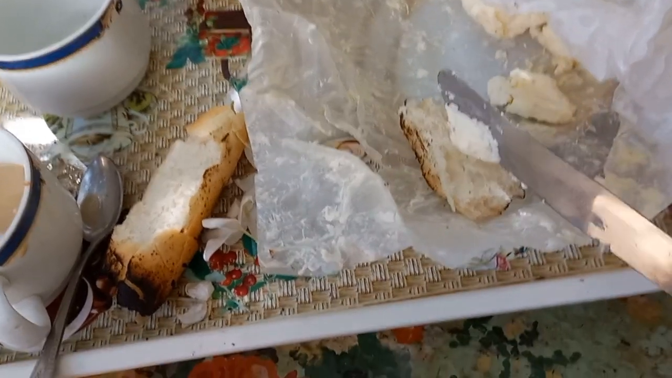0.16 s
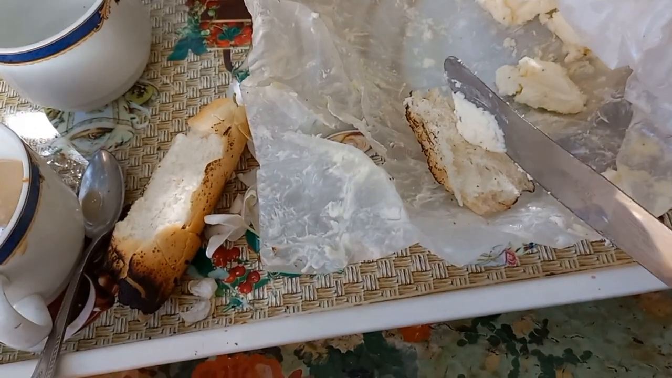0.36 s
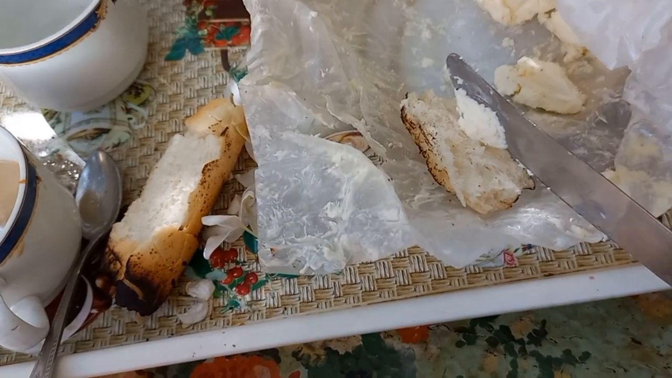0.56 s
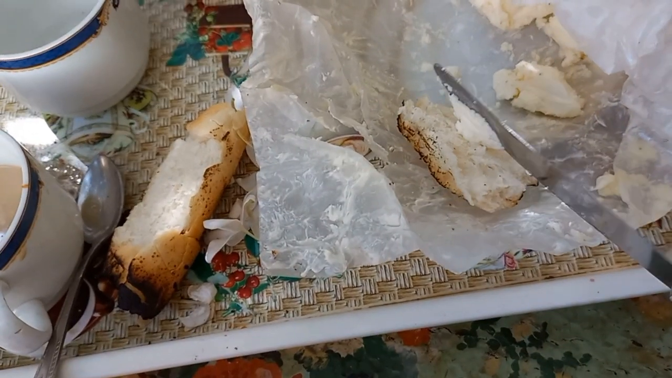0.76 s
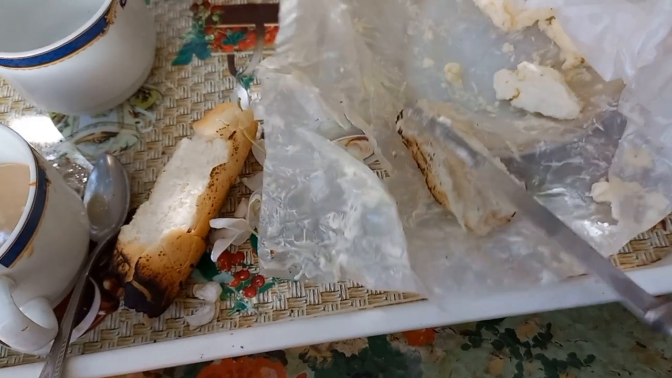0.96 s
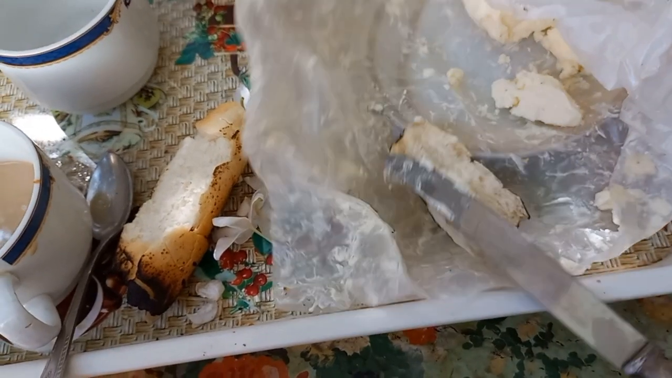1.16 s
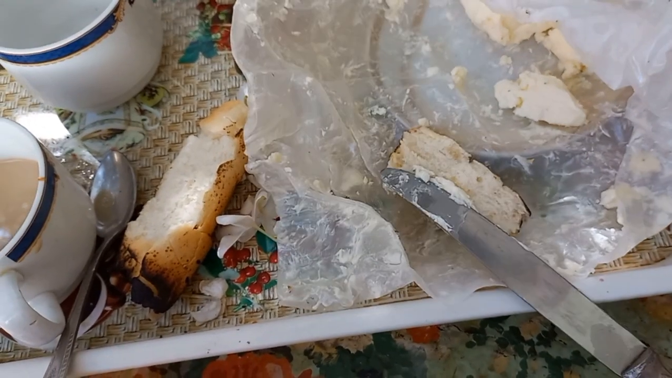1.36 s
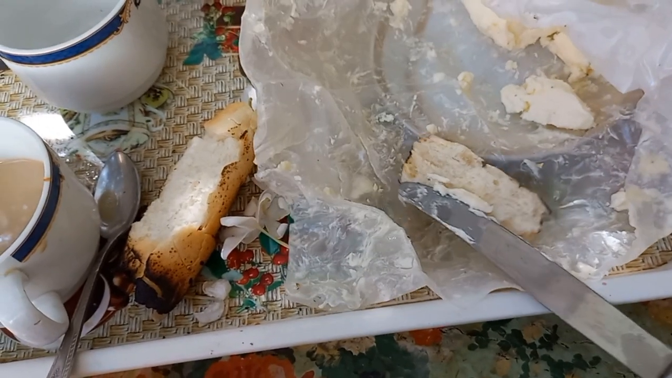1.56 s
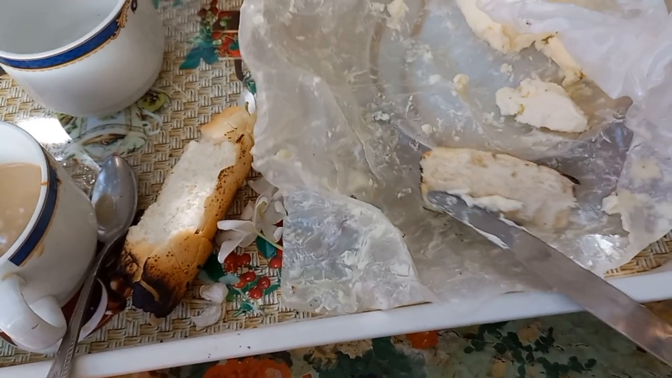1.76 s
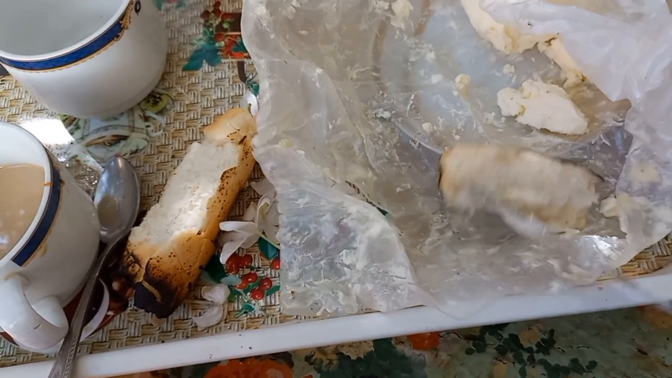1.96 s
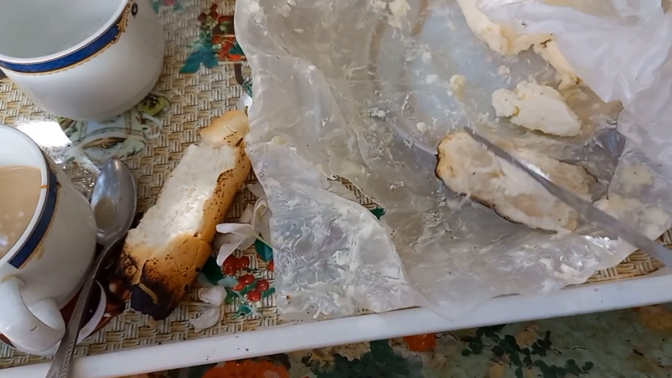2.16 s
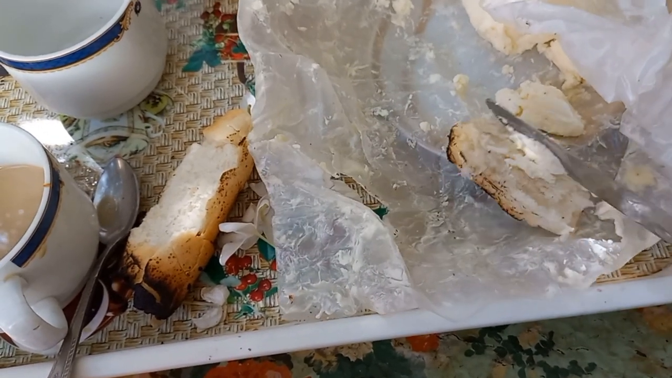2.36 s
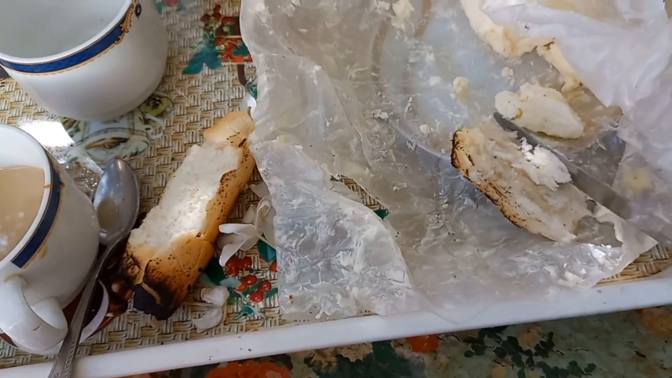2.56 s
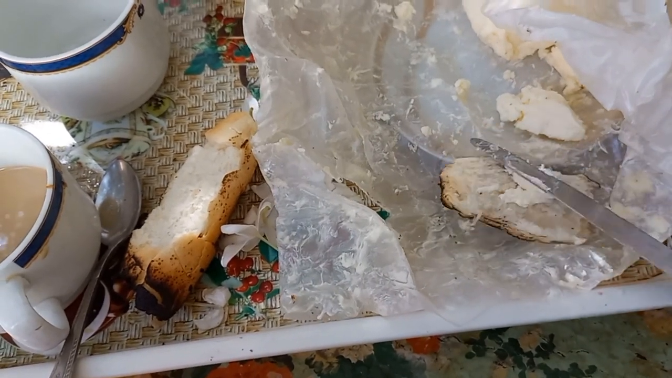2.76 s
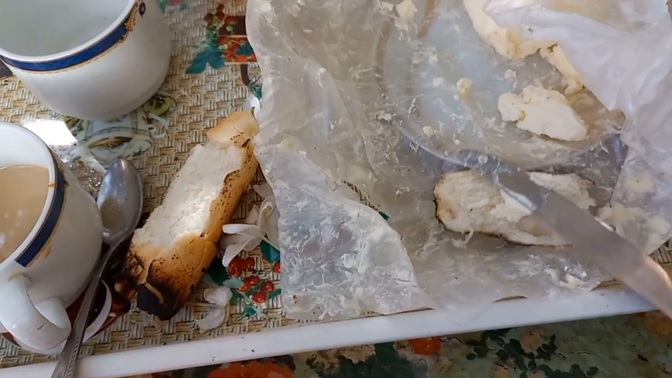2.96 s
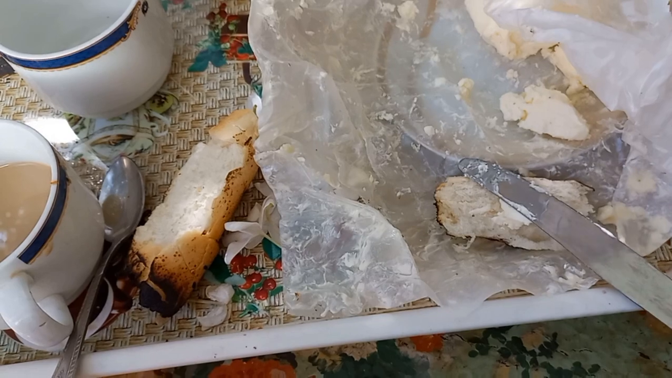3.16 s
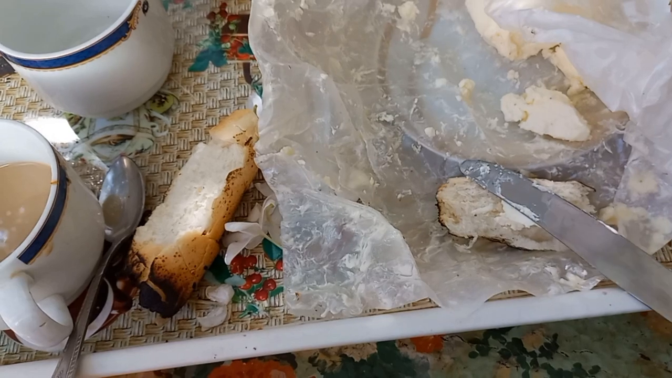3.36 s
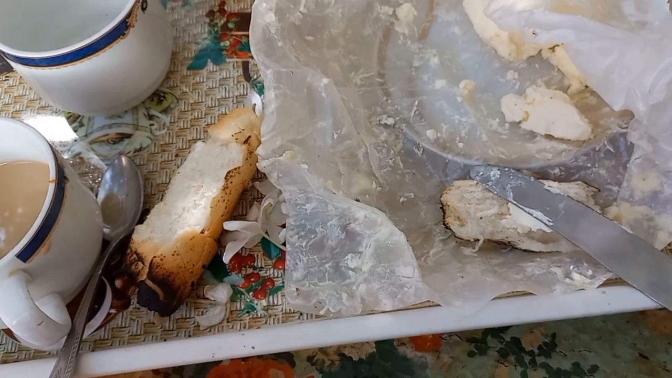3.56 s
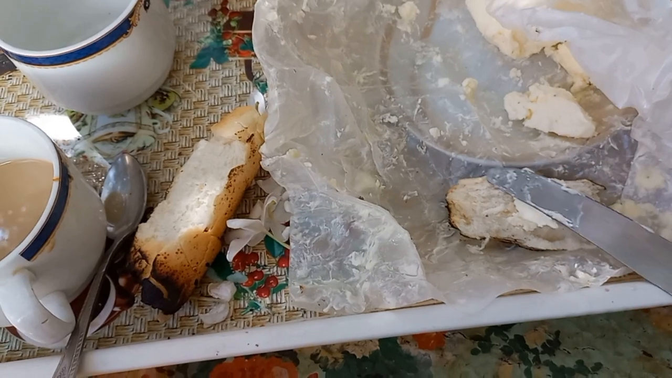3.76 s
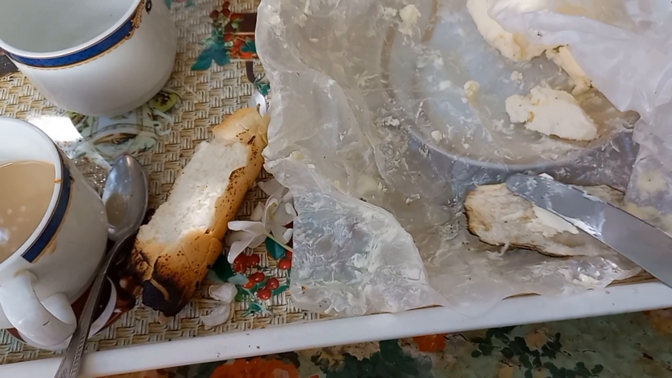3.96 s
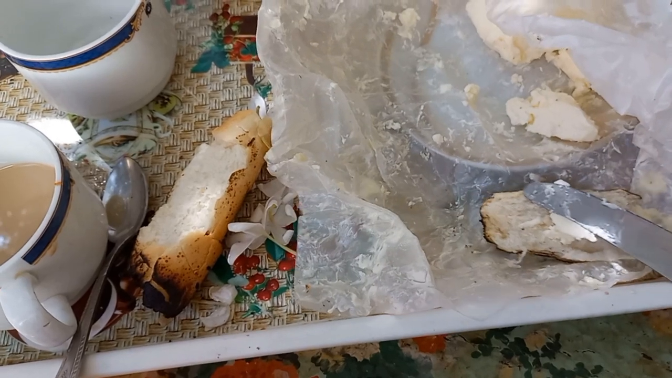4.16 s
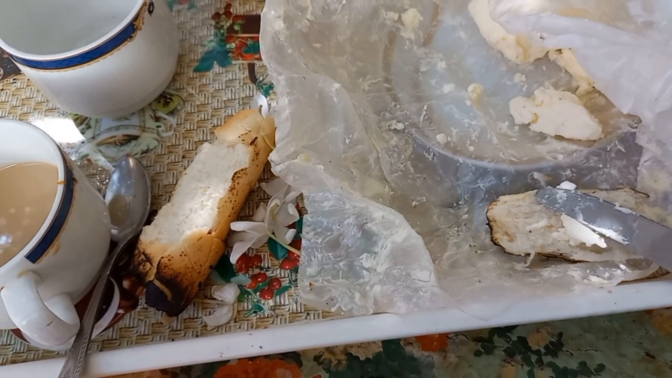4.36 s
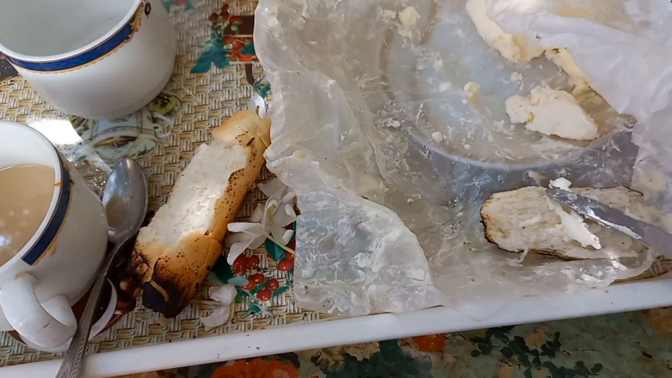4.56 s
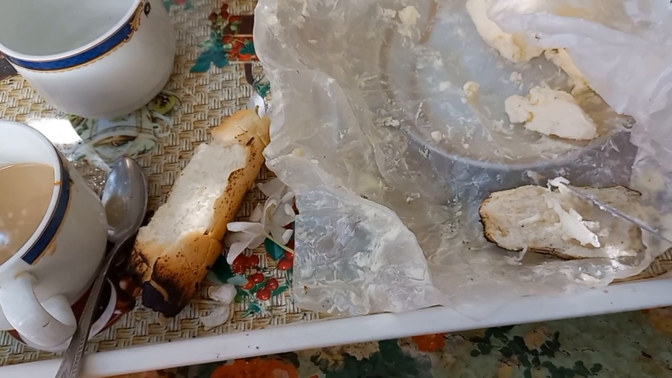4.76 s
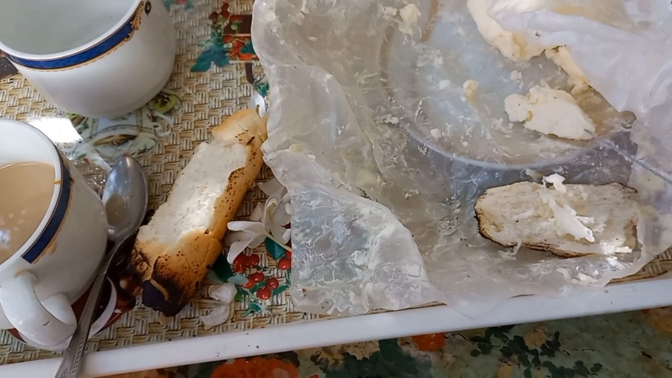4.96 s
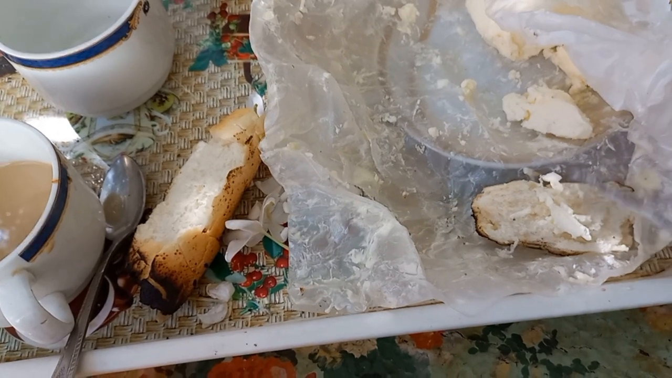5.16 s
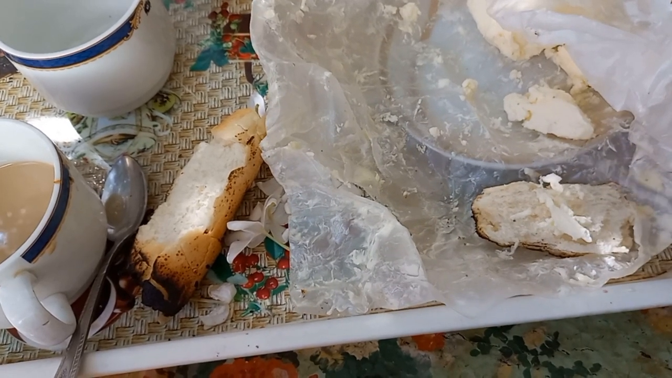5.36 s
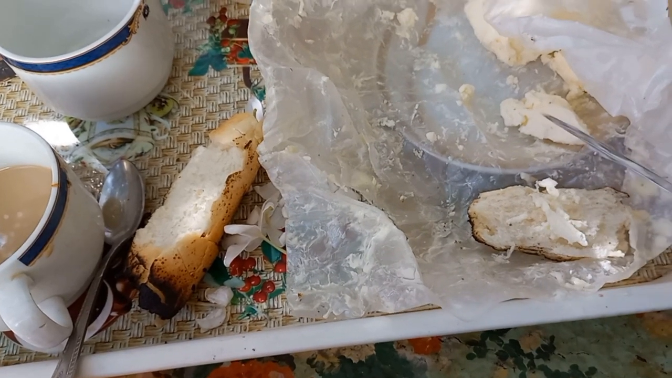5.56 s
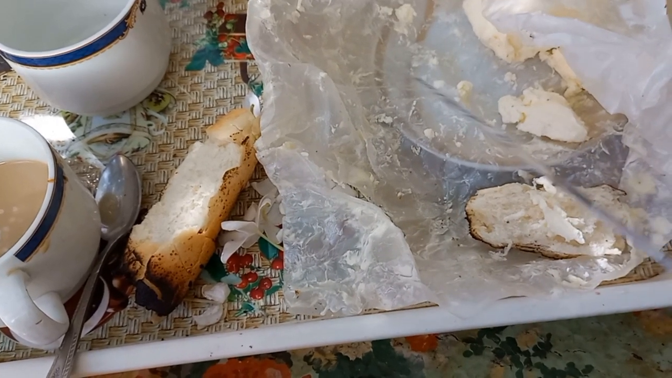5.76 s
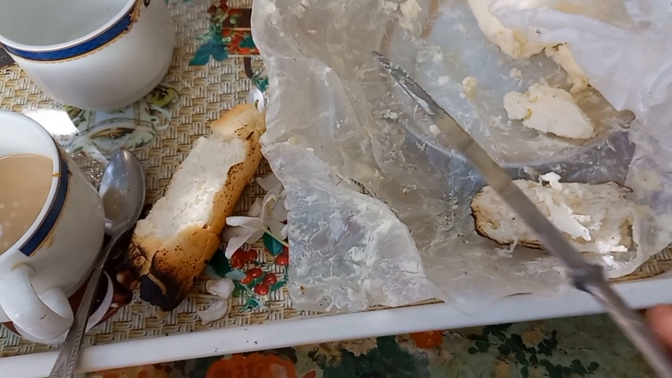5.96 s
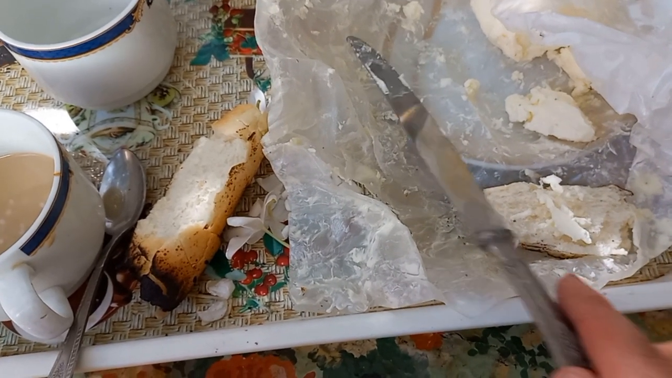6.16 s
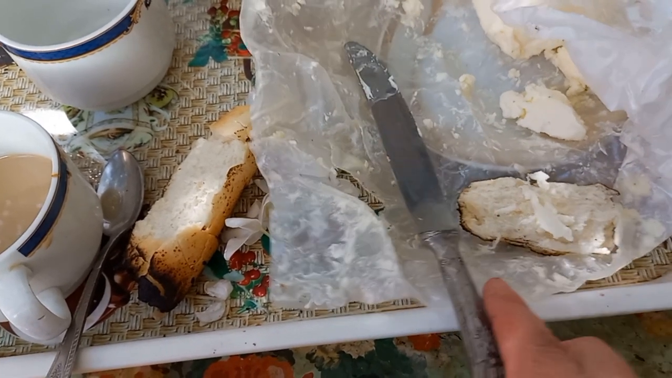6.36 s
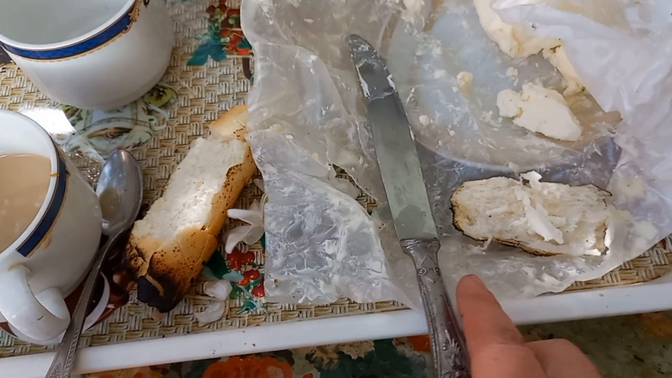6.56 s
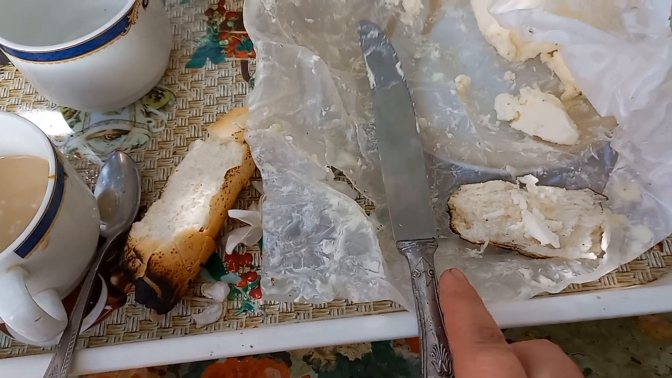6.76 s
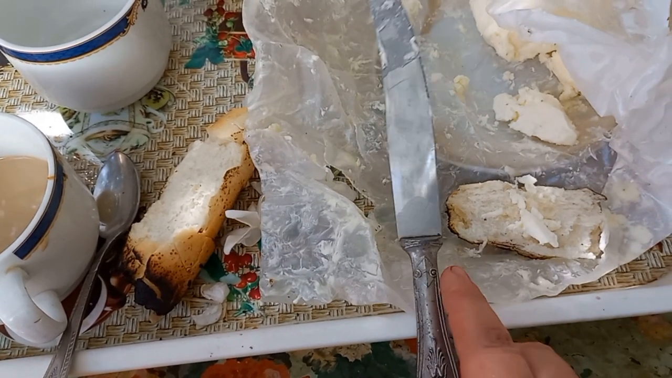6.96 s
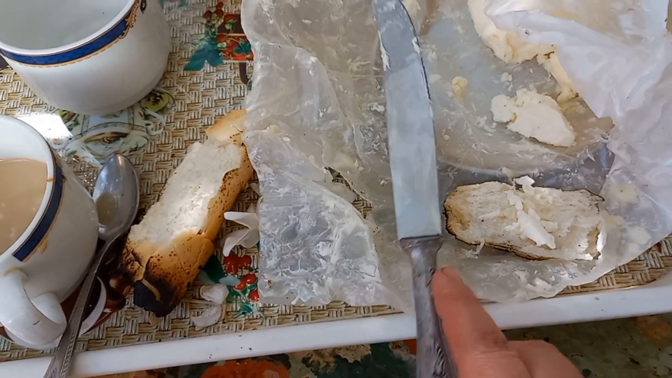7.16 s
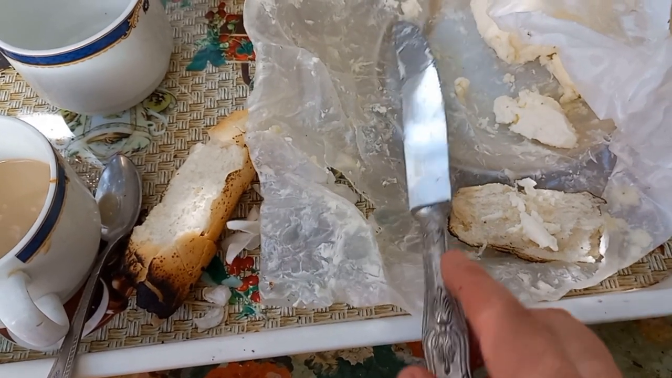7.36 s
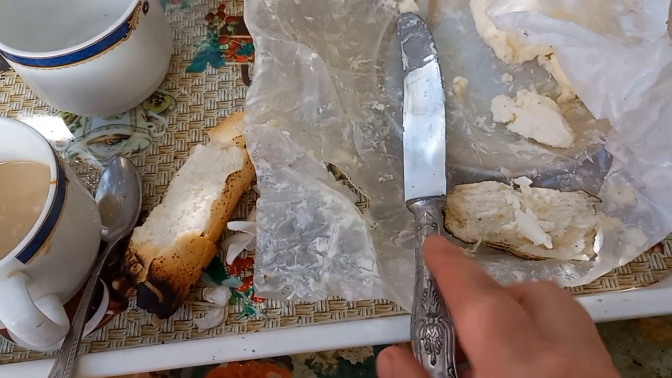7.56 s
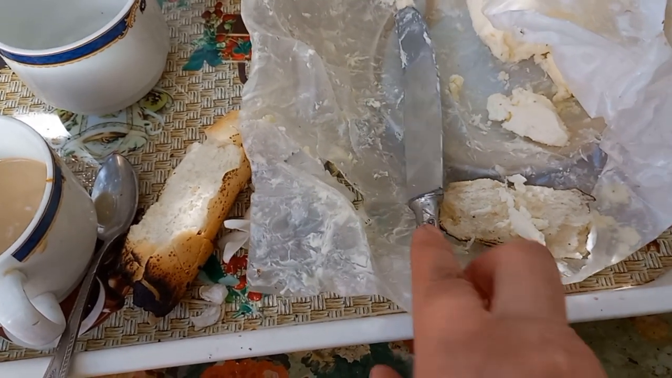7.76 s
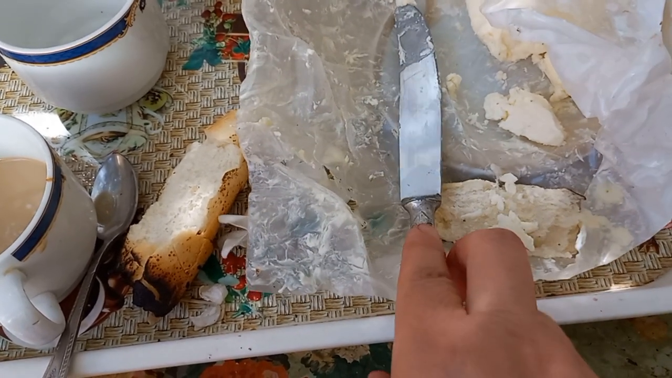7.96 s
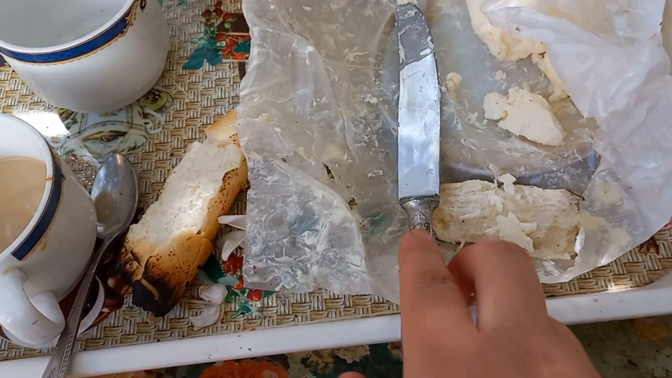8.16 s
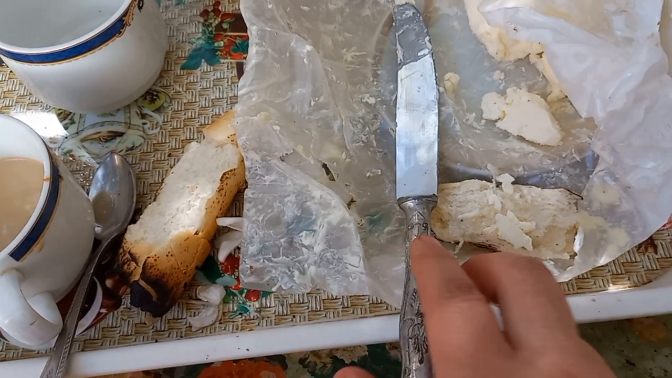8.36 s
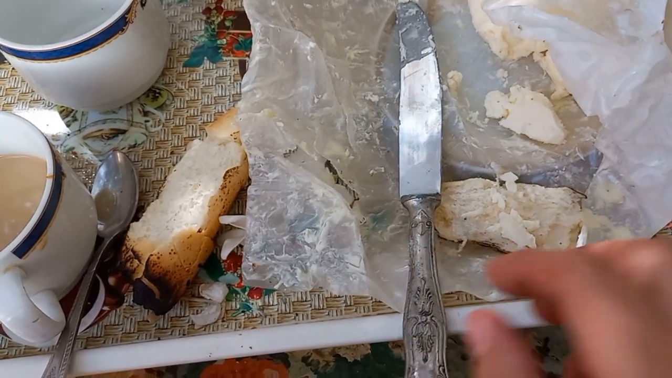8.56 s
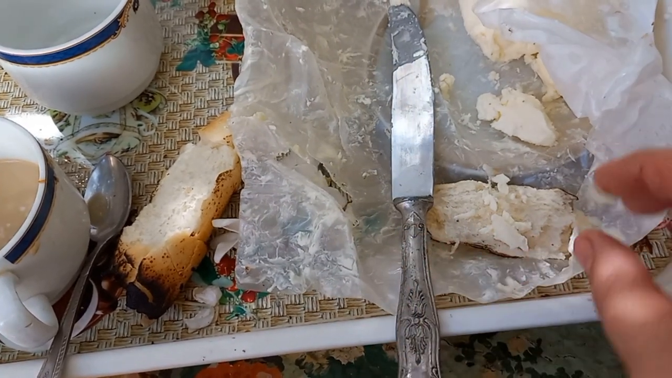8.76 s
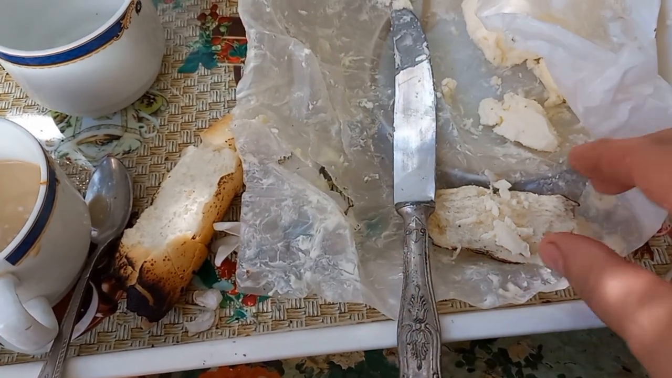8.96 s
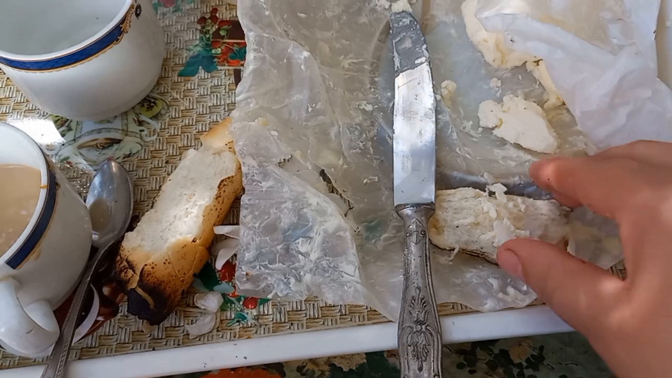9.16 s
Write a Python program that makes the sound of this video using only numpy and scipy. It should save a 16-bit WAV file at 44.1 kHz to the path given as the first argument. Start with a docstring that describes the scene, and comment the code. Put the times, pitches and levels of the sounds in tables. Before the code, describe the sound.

A table knife spreads butter on toast over a crinkling plastic bag, with a few dull knocks on a tray.

```python
"""A table knife presses and drags soft butter over toast that slides on a plastic bag.
Friction sets creases of film and crust slipping in dense grains, a rustle, and single creases snap.
Bread and knife knock the tray below into its damped modes; once, the freed blade rings.
The sounds reach a close two-port microphone directly and as a short echo from the walls.
A quiet kitchen hums underneath and the microphone hisses faintly."""
import sys
import numpy as np
from scipy import signal
from scipy.fft import rfft, irfft
from scipy.io import wavfile
from scipy.ndimage import uniform_filter1d

SR = 44100
rng = np.random.default_rng(int(sys.argv[2]) if len(sys.argv) > 2 else 0)


def master(y):
    """Save y as 16-bit WAV."""
    cut = np.clip(np.atleast_2d(y).T, -1, 1)
    pcm = np.round(cut * 32767)  # scale
    wavfile.write(sys.argv[1], SR, pcm.astype(np.int16))


N = 406161

# Spectrum of the kitchen's hum and the hiss. Each row: frequency in Hz, relative density in dB.
KITCHEN_SPECTRUM = [(40, -18), (55, -5), (90, -2.5), (157, -16), (200, -10.5), (303, -18.5), (650, -22.5),
                    (780, -27.5), (2540, -31.5), (4100, -34.5), (6900, -40.5), (9300, -46.5),
                    (11200, -41.5), (12800, -38), (16000, -36.5)]
# Likeness of that noise on the two sides. Each row: frequency in Hz, correlation.
KITCHEN_CORRELATION = [(60, 1), (180, 0.69), (550, 0.35), (1650, -0.13), (4970, -0.063), (15000, -0.02)]
# Balance of that noise. Each row: frequency in Hz, left over right in dB.
KITCHEN_BALANCE = [(60, -3.5), (240, -2.0), (950, -1.5), (3770, 0.5), (15000, -4.5)]
# Drift of the kitchen's low end. Each row: time in seconds, level in dB (taken about its mean).
RUMBLE_DRIFT = [(0.0, -53), (0.18, -57.5), (1.2, -52.5), (1.41, -55), (3.21, -52.5), (9.06, -55.5),
                (9.21, -52)]
# Strokes that drag film and crust. Each row: time of full force in seconds, hold in seconds, middle-band
# level in dB, seconds to rise 20 dB, seconds to fall 20 dB, then body, rasp and crisp in dB re middle.
KNIFE_STROKES = [(.555, 0, -52, 0.075, 0.38, -4.5, -3, -13), (.91, 0.028, -48, 0.23, 0.069, -6, -2, -8.5),
                 (1.066, 0.065, -33, 0.055, 0.11, -6.5, 1, -7),
                 (1.217, 0.016, -25, .09, 0.052, -14, -0.5, -7.5),
                 (1.5, 0.19, -38.5, 0.094, 0.13, -8, -1, -9.5),
                 (1.567, .04, -27.5, 0.011, 0.071, -9.5, 1.5, -5),
                 (1.615, .26, -25, 0.069, .07, -14.5, 0.5, -10),
                 (2.15, 0.046, -35.5, 0.042, 0.013, -12, -2.5, -13.5),
                 (2.306, 0.012, -46, 0.09, 0.014, -8, -2, -7.5),
                 (2.368, 0.0065, -33, 0.049, 0.067, -11, -1.5, -11),
                 (2.494, 0.0018, -19, .027, 0.029, -14, -1, -10.5),
                 (2.654, 0.051, -33.5, .05, 0.072, -11, -1.5, -14.5),
                 (2.767, 0, -27.5, 0.028, 0.027, -12.5, -14, -9),
                 (2.848, 0.0052, -39, 0.037, 0.29, -12.5, 0, -8.5),
                 (3.024, 0.0041, -24, 0.019, 0.063, -11.5, -1.5, -12), (3.25, 0, -55, .2, 0.77, -6, 0, -9),
                 (3.423, 0.019, -41, 0.057, 0.22, -8.5, 1.5, -5),
                 (3.538, 0.0035, -40, 0.017, 0.023, -4, 4, -1.5), (3.75, .03, -48.5, .1, .05, -4, -2, -12),
                 (3.795, 0.16, -35, .015, .05, -10, 0, -8.5),
                 (3.965, 0.049, -33, 0.044, 0.39, -11, 1.5, -5),
                 (4.198, 0.084, -45, 0.5, 0.04, -7.5, 0, -7.5),
                 (4.568, 0.02, -53, 0.13, 0.15, -9.5, 1.5, -3),
                 (4.665, 0.0038, -46, 0.049, 0.12, -7.5, -1, -9),
                 (4.869, 0.0083, -47, 0.1, 0.096, -9.5, 0, -4),
                 (5.238, 0.012, -38.5, 0.01, 0.032, -3.5, -2, -6.5),
                 (6.255, 0.072, -35.5, 0.012, 0.07, -4.5, -0.5, -6),
                 (6.36, 0.065, -40, .05, 0.043, -5.5, -0.5, -7.5), (6.48, 0, -39.5, .07, 0.08, -8, 0, -11),
                 (6.519, 0.11, -38, 0.093, 0.09, -8.5, -2, -7.5),
                 (6.675, 0.038, -40, 0.09, 0.11, -7.5, 1.5, -1), (6.886, 0, -44, 0.072, 0.14, -6, -0.5, -7),
                 (7.0, 0, -55.5, 0.067, .35, -6, 0.5, -3.5),
                 (7.207, 0.066, -34, 0.032, 0.071, -2.5, -2, -8.5),
                 (7.308, 0.11, -40.5, 0.02, 0.073, -6.5, -2, -10),
                 (7.487, 0, -43, 0.16, 0.069, -3, -1.5, -9),
                 (7.539, 0.0085, -46.5, 0.088, 0.043, -8, 1, -4.5),
                 (7.76, .07, -45, .2, 0.12, -4.5, -2.5, -10),
                 (7.858, 0.024, -36.5, 0.049, 0.18, -1.5, -10, -11.5),
                 (7.946, 0, -26.5, .017, 0.038, -10, 1.5, -8), (7.98, 0.041, -42, .03, .04, -9.5, 0, -7),
                 (8.08, 0.043, -53, .1, 0.12, -14, 0.5, -8),
                 (8.18, 0.017, -40.5, 0.098, 0.091, -5.5, -1.5, -8),
                 (8.425, 0.014, -39, 0.14, 0.017, -5, -0.5, -6),
                 (8.914, 0, -39, 0.013, 0.13, -2.5, -1, -4.5), (8.962, 0.1, -44, 0.017, 0.3, -7, 2, -2.5),
                 (9.138, 0.023, -37, 0.11, 0.048, -9, 0.5, -2)]
# Colour of film and toast. Each row: frequency in Hz, relative density in dB.
FILM_SPECTRUM = [(180, -20.5), (300, -17.5), (460, -17.5), (860, -10), (1100, -10.5), (1270, -11.5),
                 (1870, 3.5), (2360, 4), (2700, 7), (4500, 0), (5150, -2.5), (6400, -5), (8600, -10),
                 (9400, -14.5), (16000, -21)]
# Likeness of the film's sound at the two ports. Each row: frequency in Hz, coherence.
PORT_COHERENCE = [(60, 1), (300, 0.9), (1000, 0.81), (3000, 0.58), (15000, 1)]
# Phase between the ports. Each row: frequency in Hz, lead of the left port in radians.
PORT_LEAD = [(1000, 0.75), (2000, 0.64), (4500, 1.6), (6000, 1.8), (9000, 1.66), (16000, 1.63)]
# Reverberation of the walls. Each row: frequency in Hz, seconds to fall 60 dB.
WALL_DECAY = [(200, 0.7), (1000, 0.15), (4000, 0.21), (12000, 0.19)]
# Creases of film and crust that snap. Each row: start in seconds, middle-band level in dB,
# then body, rasp and crisp in dB re middle, left over right in dB.
CREASE_SNAPS = [(0.849, -40.5, -6, -4, -19, -2), (0.951, -41.5, -12, -0.5, -14, -3),
                (1.0195, -22.5, -34, -3, -11, -2.5), (1.052, -30, -16, -14, -7, -1),
                (1.0747, -17.5, -20, 1, -8.5, 0), (1.118, -29, -3, -18, -29, 7),
                (1.187, -25, -1, -0.5, -21, 0), (1.2296, -16.5, -25, -7, -12.5, -3),
                (1.471, -36, -12, -5, -21, 0), (1.6192, -21.5, -8, 5.5, -1, -6),
                (1.855, -17.5, -19, 1.5, -11, -2), (1.863, -21.5, -18, -10, -24.5, -1),
                (1.9865, -21, -9, -5, -20, -2), (1.9972, -11, -18, 0, -8.5, -1.5),
                (2.147, -45, -9, -8, -20, -1), (2.226, -36, -10, -6, -23, -4),
                (2.269, -41, -18, -11, -31, 1), (2.292, -43, -5, -10, -27, -6),
                (2.339, -32, -16, -2, -12, -7), (2.362, -25, -16, -6, -16, 6),
                (2.372, -26, -17, -4, -10, -7), (2.402, -28, -7, -11, -14, 0),
                (2.433, -30, -9, -3, -9.5, -1), (2.471, -29, -12, -8, -20, 1),
                (2.483, -26, -12, -12, -12, -3), (2.505, -19.5, -32, -2, -9.5, -6),
                (2.64, -31, -4, -9, -26, 0), (2.687, -27, -6, -5, -10.5, 1),
                (2.758, -32.5, -16, 7, -16, -3), (2.8347, -19.5, -20, 3.5, 2, -0.5),
                (2.947, -42.5, -13, -8, 0, -4), (2.9872, -27, -17, 1.5, -10.5, -1),
                (3.007, -40.5, 3, 3, 2, -1), (3.0182, -18, -15, 1.5, 0, -5), (3.044, -27, -6, 12, 1, -1),
                (3.0506, -12, -17, -2, -7.5, -2), (3.129, -35, -10, -2, -11, -6),
                (3.2252, -37, -20, -9, -20, 1), (3.246, -24.5, -11, -17, -19, 0),
                (3.381, -35.5, -29, 4.5, -1, -5), (3.414, -24, -15, -1, -5.5, -2.5),
                (3.483, -41, -12, 6, -2, -4), (3.5268, -19.5, -19, -1.5, -16, -1),
                (3.788, -32.5, -4, -7, -19, -1), (3.83, -38, -25, 0, 1, -7),
                (3.9152, -16.5, -12, 3, -6.5, -3), (3.956, -19, -16, 3.5, -3.5, 1),
                (3.9734, -24, -7, -5, -4.5, -3), (4.079, -22, -11.5, -1, 3, -0.5),
                (4.155, -25, -9, 5, 5, -2), (4.212, -39, -14, 2, 2, -3), (4.249, -52, -3, 5, 12, -9),
                (4.312, -34.5, -10, -6, 5.5, -6), (4.654, -44.5, -20, -13, 2, -3),
                (5.212, -44, -18, 2, 1, -3), (5.223, -35.5, -19, -1, -11, -1), (6.246, -43, 5, 7, 5, -7),
                (6.474, -30, -7, -4, -11, -3), (6.509, -33.5, -6, -10, -16, -3),
                (6.5772, -26.5, 6, -15, -31, -2.5), (6.677, -44, -10, -5, 4, -2),
                (6.697, -40.5, -15, -5, 4, -4), (6.71, -40, -10, 2, 8, -2), (6.724, -39, -15, 0, 5.5, -2),
                (6.761, -31.5, -2.5, -4, -21, -1), (6.878, -23.5, -2, -8, -27, 2),
                (7.199, -40, -9, -5, -15, 2), (7.2441, -16.5, -4, -15, -22, 0),
                (7.249, -10.5, -6, -4, -13, -2), (7.32, -31.5, -0.5, -1.5, -6, -1),
                (7.5865, -39.5, -4.5, -13, -14, 0), (7.882, -24.5, -7, -6.5, -30, -7),
                (7.932, -39, -10, 7.5, 0, 3), (7.9365, -26, -17, 3.5, -2, -3),
                (7.95, -34, -13, -9, 7.5, -3), (7.9724, -22.5, -20, -1, -6, 3),
                (8.161, -37, -7, -8, -21, 4), (8.297, -41, -5, -3.5, -9, 3), (8.424, -27.5, -1, 0, -9.5, 0),
                (8.8895, -28, -5, -13, -10, -2), (9.119, -34.5, -7, 2.5, -3, 0),
                (9.133, -46, -10, 0, 9, -2)]
# Knocks on the tray. Each row: start in seconds, peak in dB before radiation,
# weight of the low modes in dB, weight of the high modes in dB, contact time in seconds.
TRAY_KNOCKS = [(1.119, -23.5, -3, 0, 0.00025), (1.258, -16.5, -6.5, -7, 0.000087),
               (3.049, -27, -1, -1, 0.00037), (3.127, -29.5, -12, -28, .0005),
               (4.6635, -20, -1.5, 0, 0.00011), (5.238, -21.5, -3.5, -3, 0.00021),
               (6.251, -42, 18, -6, 0.0013), (6.667, -18.5, -13, -20, 0.00023),
               (6.693, -44, 5, -14, 0.0014), (7.263, -17.5, 9, -2, 0.0015),
               (7.845, -5.5, -12.5, -6, 0.00021), (7.848, -6, -23, 11, 0.000088)]
# Modes of the tray. Each row: frequency in Hz, relative level in dB, seconds to fall 60 dB.
TRAY_MODES = [(197.6, 0.5, 0.19), (283, -6.5, 0.15), (355.6, -2.5, 0.085), (466, -9.5, 0.037),
              (588, -9, 0.045), (740, -5, 0.051), (916, 7, 0.025), (1480, -15, 0.044), (1644, -2, 0.038),
              (1844, 15.5, 0.017), (2130, 1, 0.045), (2520, -3, 0.027)]


def gain_of(db):
    """Amplitude ratio: tenfold for every 20 dB."""
    return 10 ** (np.asarray(db) / 20)


def unit_rms(x):
    """Normalisation to a mean power of 1."""
    return x / np.sqrt(np.mean(x ** 2) + 1e-20)


def curve_at(points, hz):
    """Interpolation of a table on a logarithmic frequency axis."""
    f, value = np.transpose(points)
    return np.interp(np.log(hz + 1), np.log(f + 1), value)


def pan(balance_db):
    """A level difference split evenly into left and right gains."""
    return gain_of([.5 * balance_db, -.5 * balance_db])[..., None]


def kitchen_noise(level_db=-47.5, patch_db=1.9, drift_below_hz=300):
    """Room hum and microphone hiss as shaped Gaussian noise, its spectrum wavering in slow patches."""
    frames, hz = N // 512 + 5, np.fft.rfftfreq(2048, 1 / SR)
    a, b, c, d, patches = rng.standard_normal((frames, 1025, 5)).T
    patches = unit_rms(uniform_filter1d(uniform_filter1d(patches, size=20, axis=0), size=10, axis=1))
    drift_db = np.interp(np.arange(frames) * 512 / SR, *np.transpose(RUMBLE_DRIFT))
    drift_db = (drift_db - drift_db.mean()) / (1 + (hz[:, None] / drift_below_hz) ** 2)
    alike = curve_at(KITCHEN_CORRELATION, hz)[:, None]
    left = a + 1j * b
    right = alike * left + np.sqrt(1 - alike ** 2) * (c + 1j * d)
    colour = gain_of(curve_at(KITCHEN_SPECTRUM, hz)[:, None] + patch_db * patches + drift_db)
    spectra = np.array([left, right]) * colour * pan(curve_at(KITCHEN_BALANCE, hz))
    noise = signal.istft(spectra, nperseg=2048, noverlap=1536)[1][:, :N]
    return gain_of(level_db) * unit_rms(noise)


def stroke_envelopes(settle_db=-26, settle_s=0.13):
    """Incoherent sources add in power: in four bands, strokes rise, hold, fall and the film settles."""
    t, power = np.arange(0, N + 64, 64) / SR, 0
    for start, hold, level_db, rise, fall, *shares_db in KNIFE_STROKES:
        before, after = np.maximum(start - t, 0), np.maximum(t - start - hold, 0)
        attack = gain_of(level_db - 20 * before / rise) ** 2
        release = gain_of(-20 * after / fall) ** 2 + gain_of(settle_db - 20 * after / settle_s) ** 2
        power = power + np.outer(gain_of([0] + shares_db) ** 2, attack * release)
    return [np.interp(np.arange(N) / SR, t, band) for band in np.sqrt(power)]


def film_bands(edges_hz=(1200, 3000, 5200)):
    """Minimum-phase responses of the film, of unit energy: middle, body (lowest), rasp, crisp (top)."""
    hz = abs(np.fft.fftfreq(4096, 1 / SR))
    body, below_rasp, below_crisp = (1 / (1 + (hz / edge) ** 8) for edge in edges_hz)
    shares = abs(np.array([below_rasp - body, body, below_crisp - below_rasp, 1 - below_crisp]))
    log_gain = np.log(np.sqrt(shares) * gain_of(curve_at(FILM_SPECTRUM, hz)) + 1e-5)
    taps = np.fft.ifft(np.exp(np.conj(signal.hilbert(log_gain)))).real[:, :1024]
    return taps / np.linalg.norm(taps, axis=1, keepdims=True)


def two_ports(left, independent):
    """Partial coherence: the right port hears a phase-lagged share of the left plus unrelated sound."""
    hz = np.fft.rfftfreq(len(left), 1 / SR)
    alike = curve_at(PORT_COHERENCE, hz)
    lag = np.exp(-1j * curve_at(PORT_LEAD, hz))
    right = alike * lag * rfft(left) + np.sqrt(1 - alike ** 2) * rfft(independent)
    return np.array([left, irfft(right, len(left))])


def film_rustle(top_slips_per_s=20000, crowding=.15, spread_db=3.5, clump_db=1.5, clump_s=.008):
    """Stick-slip friction: tiny creases slip in clumps, and a harder drag sets more of them slipping."""
    envelopes = stroke_envelopes()
    density = np.clip((envelopes[0] / envelopes[0].max()) ** crowding, .1, 1)
    shared, *per_band = unit_rms(uniform_filter1d(rng.standard_normal((5, N)), round(clump_s * SR)))
    clumps = unit_rms(gain_of(clump_db * (shared + np.array(per_band))))
    sizes = gain_of(spread_db * np.minimum(rng.exponential(1, (2, N)), 5))
    slipping = rng.random((2, N)) < density * top_slips_per_s / SR
    grains = sizes * slipping * rng.choice([-1., 1.], (2, N))
    drive = two_ports(*unit_rms(grains / np.sqrt(density)))
    bands = [signal.oaconvolve(drive, taps[None])[:, :N] for taps in film_bands()]
    rustle = sum(envelope * clump * band for envelope, clump, band in zip(envelopes, clumps, bands))
    return pan(balance_db=-1.2) * rustle


def wall_echo(near):
    """Reverberation: sparse reflections of random sign, each frequency dying at its own rate."""
    reflections = np.zeros((2, SR // 2))
    delays = np.arange(200, SR // 2 - 20, 20)
    delays = delays + rng.integers(0, 20, (2, len(delays)))
    np.put_along_axis(reflections, delays, rng.choice([-1., 1.], delays.shape), axis=1)
    hz, t, spectra = signal.stft(reflections, SR, nperseg=256)
    decay = gain_of(-60 * t / curve_at(WALL_DECAY, hz)[:, None])
    tail = signal.istft(spectra * decay, SR, nperseg=256)[1]
    return signal.fftconvolve(near.mean(0)[None], tail / np.linalg.norm(tail[0]), axes=1)[:, :N]


def crease_snaps(attack_s=.0004, jolt_t60=0.0091, flurry_db=-20, flurry_t60=0.06):
    """Buckling: a crease gives way in one sharp jolt, then a faint flurry as its neighbours settle."""
    bands, t, out = film_bands(), np.arange(2048) / SR, np.zeros((2, N + 6000))
    bands[3] = signal.lfilter([1, -0.33], [1], bands[3])  # a sudden break reaches higher than a slip
    decay = gain_of(-60 * t / jolt_t60) + gain_of(flurry_db - 60 * t / flurry_t60)
    envelope = np.minimum(t / attack_s, 1) * decay
    for start, level_db, *shares_db, balance_db in CREASE_SNAPS:
        drive = two_ports(*rng.standard_normal((2, len(t)))) * envelope
        parts = signal.fftconvolve(drive[None], bands[:, None], axes=2)
        peak_power = uniform_filter1d(parts.mean(1) ** 2, size=64).max(1)
        parts /= np.sqrt(peak_power)[:, None, None]
        snap = np.tensordot(gain_of([0] + shares_db), parts, axes=1)
        out[:, round(start * SR):][:, :snap.shape[1]] += gain_of(level_db) * pan(balance_db) * snap
    return out[:, :N]


def tray_knocks(low_hz=300, high_hz=1200, scatter_db=0.22, detuning=0.015):
    """Modal vibration: a short uneven push rings the tray, each struck spot weighting the modes anew."""
    t, out = np.arange(12000) / SR, np.zeros(N + 13000)
    hz, mode_db, t60 = np.transpose(TRAY_MODES)[:, :, None]
    for start, peak_db, low_db, high_db, contact_s in TRAY_KNOCKS:
        scatter, detune = rng.standard_normal((2, len(TRAY_MODES), 1))
        spot_db = low_db / (1 + (hz / low_hz) ** 4) + high_db / (1 + (high_hz / hz) ** 4)
        amplitudes = gain_of(mode_db + spot_db + scatter_db * scatter - 60 * t / t60)
        ring = (amplitudes * np.sin(2 * np.pi * hz * (1 + detuning * detune) * t)).sum(0)
        push = np.exp(-t[:900] / max(contact_s, .0001)) * (1 + rng.standard_normal(900))
        knock = signal.fftconvolve(ring, push)
        out[round(start * SR):][:len(knock)] += gain_of(peak_db) * knock / abs(knock).max()
    radiation = signal.butter(2, 150, "high", fs=SR, output="sos")  # a small tray moves no deep bass
    return pan(balance_db=-2.5) * signal.sosfilt(radiation, out[:N])


def blade_ring(start_s=4.312, hz=8600, level_db=-32, t60=0.074):
    """Free damped vibration: the released steel blade rings once in a single thin mode."""
    t = np.maximum(np.arange(N) / SR - start_s, 0)
    return gain_of(level_db - 60 * t / t60) * np.sin(2 * np.pi * hz * t)


def scene(echo_db=-13.5):
    """Superposition of film, tray and blade, their echo from the walls, and the kitchen."""
    near = film_rustle() + crease_snaps() + tray_knocks() + blade_ring()
    return near + gain_of(echo_db) * wall_echo(near) + kitchen_noise()


def record(dry, low_hz=44, high_hz=16000):
    """Band limiting: the microphone drops the deepest bass and the highest treble."""
    thinned = signal.sosfilt(signal.butter(8, low_hz, "high", fs=SR, output="sos"), dry)
    lowpass = signal.firwin(255, high_hz, window=("kaiser", 7), fs=SR)
    return signal.oaconvolve(thinned, lowpass[None], "same")


dry = scene()
out = record(dry)
master(out)
```